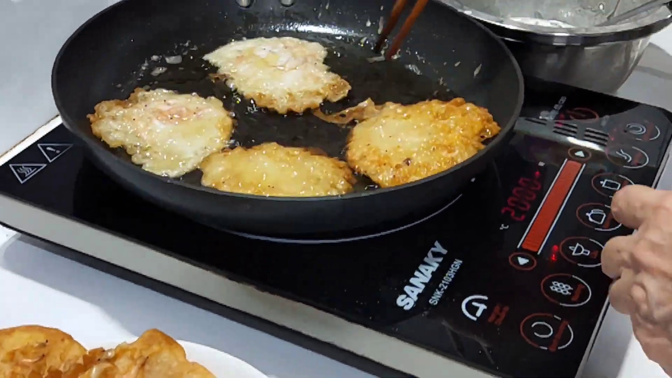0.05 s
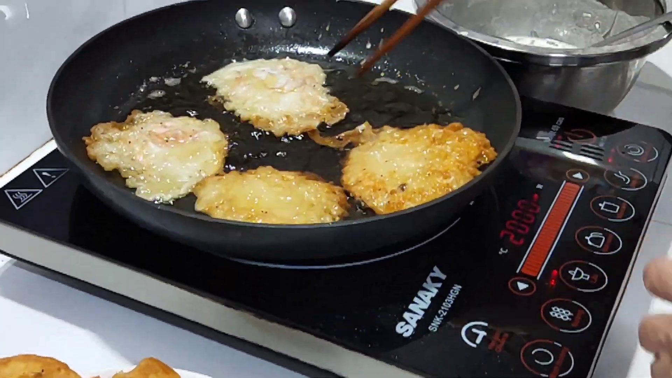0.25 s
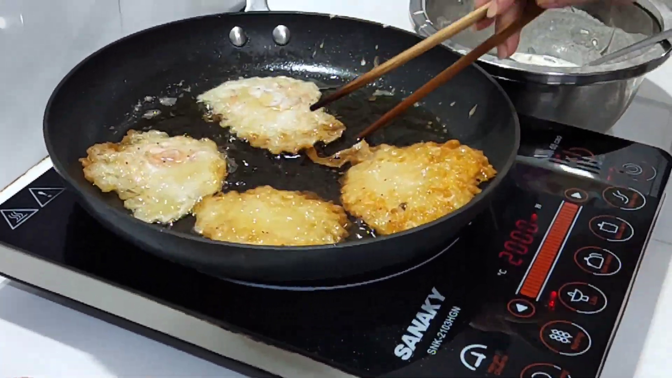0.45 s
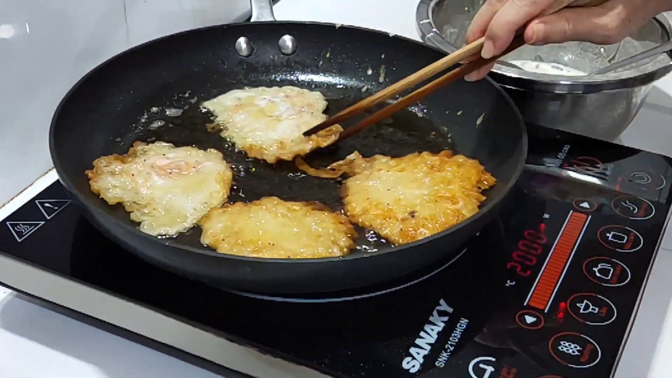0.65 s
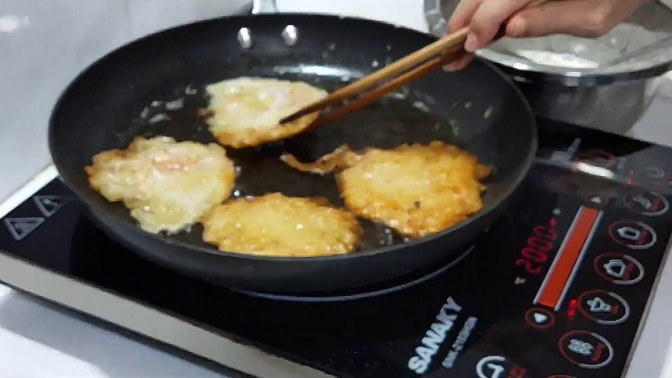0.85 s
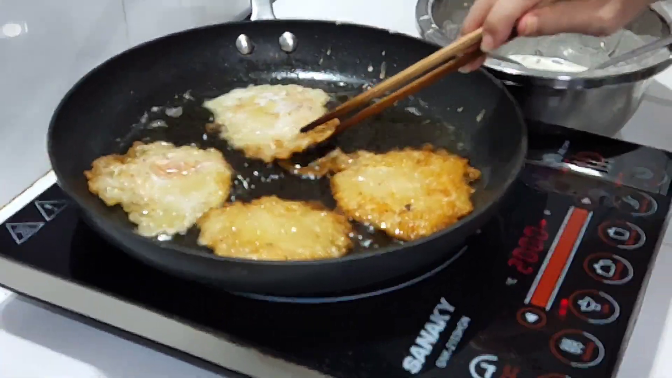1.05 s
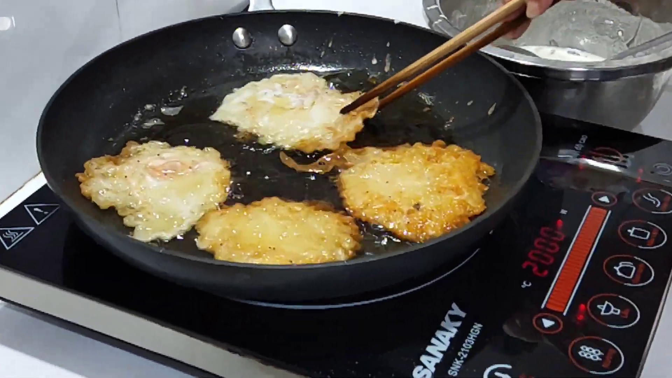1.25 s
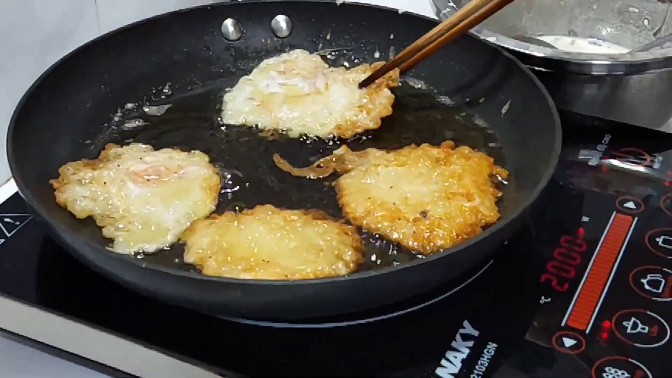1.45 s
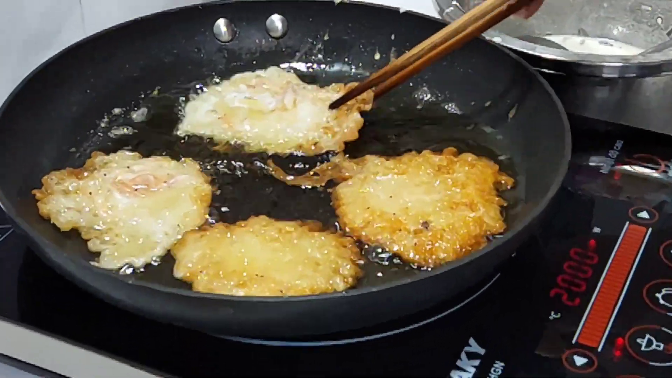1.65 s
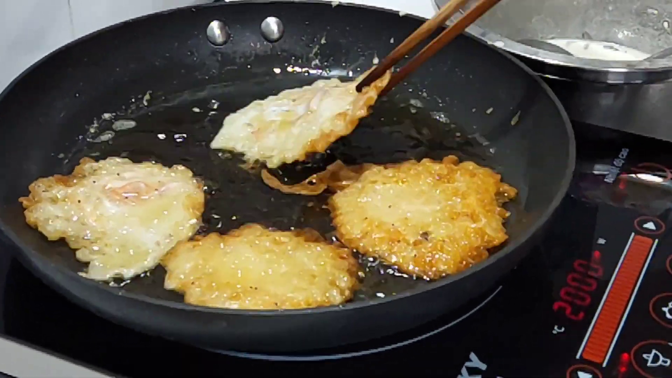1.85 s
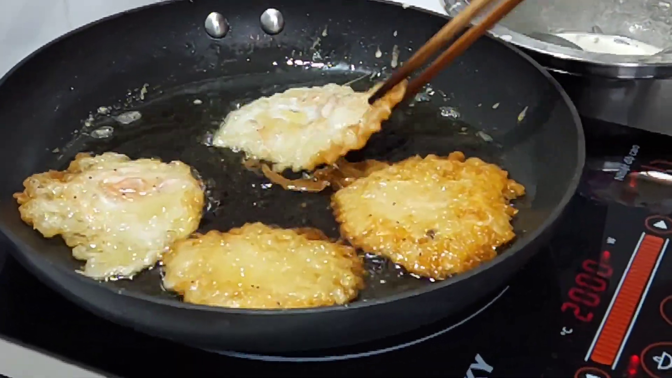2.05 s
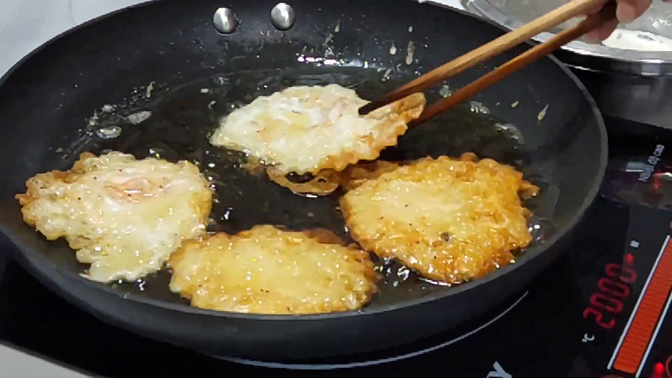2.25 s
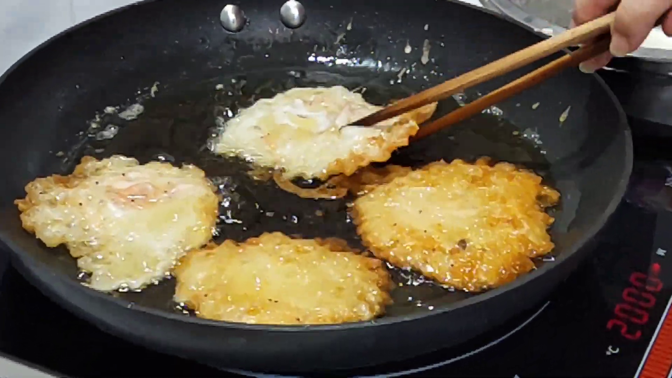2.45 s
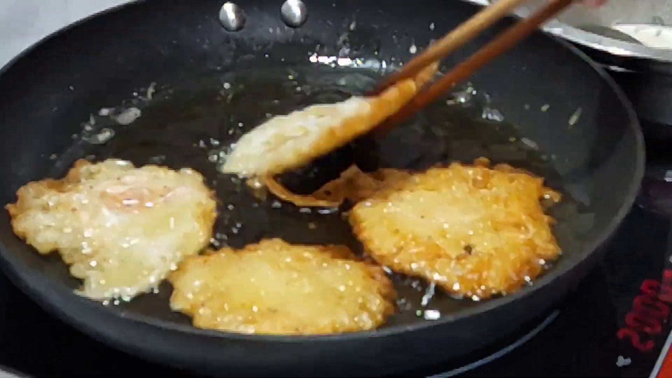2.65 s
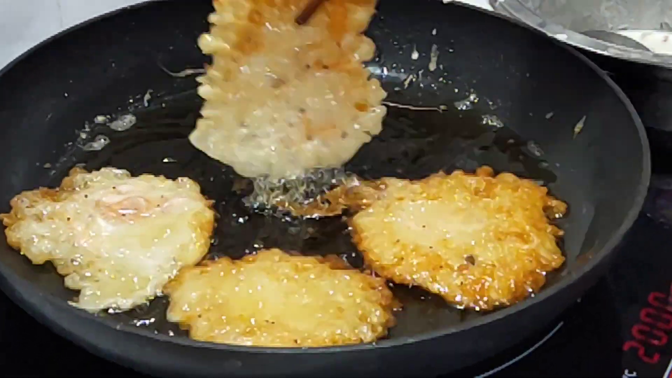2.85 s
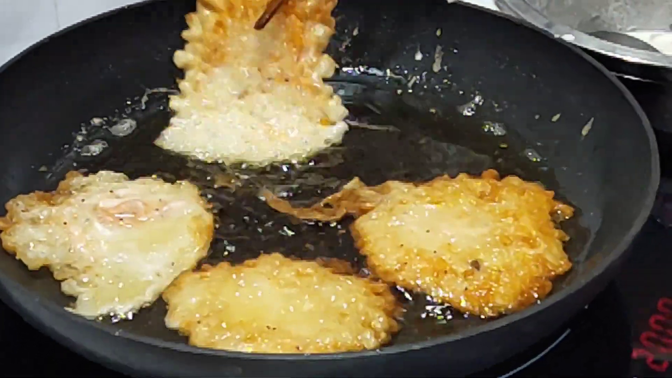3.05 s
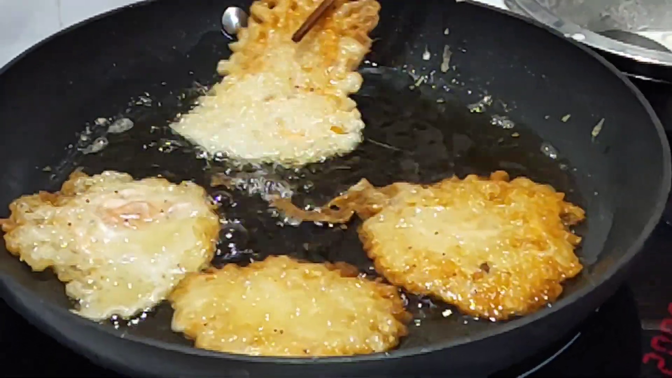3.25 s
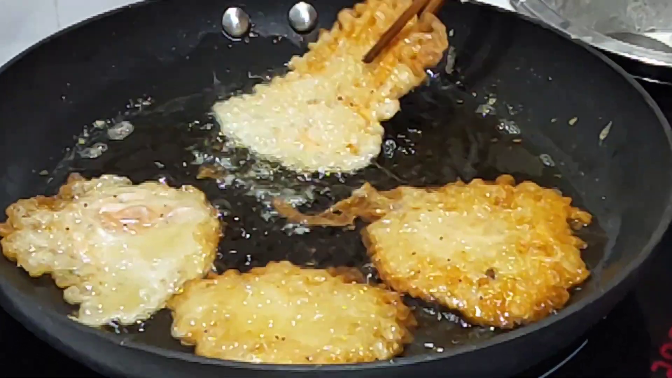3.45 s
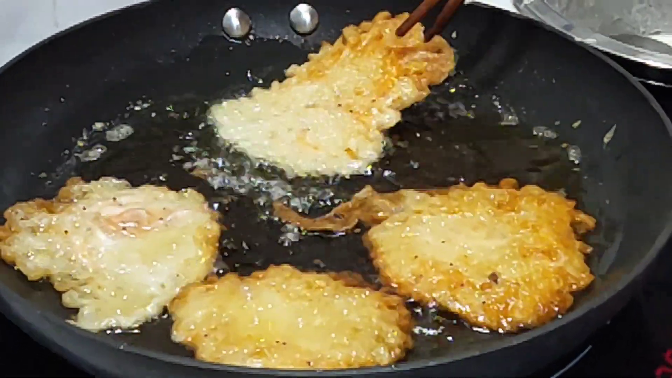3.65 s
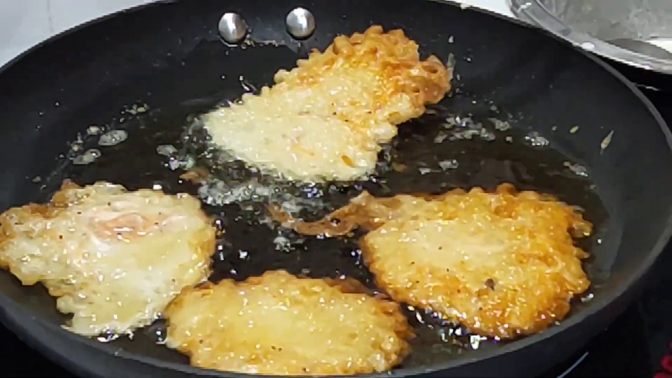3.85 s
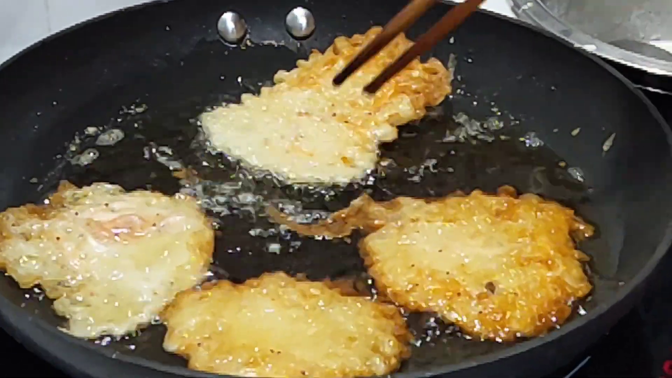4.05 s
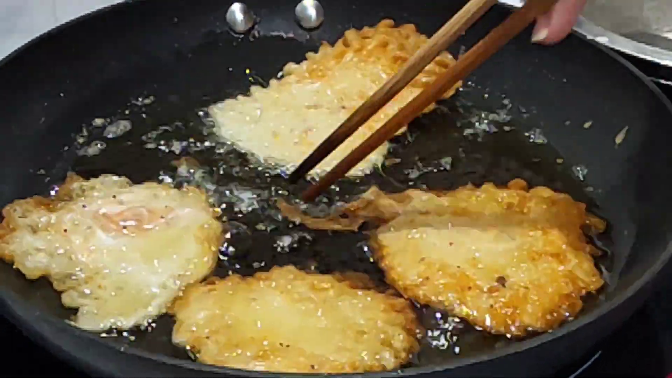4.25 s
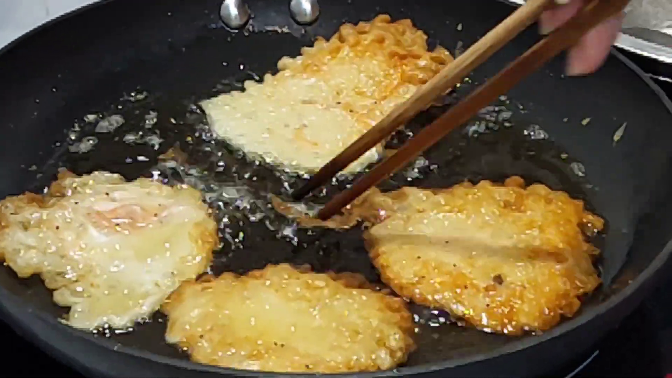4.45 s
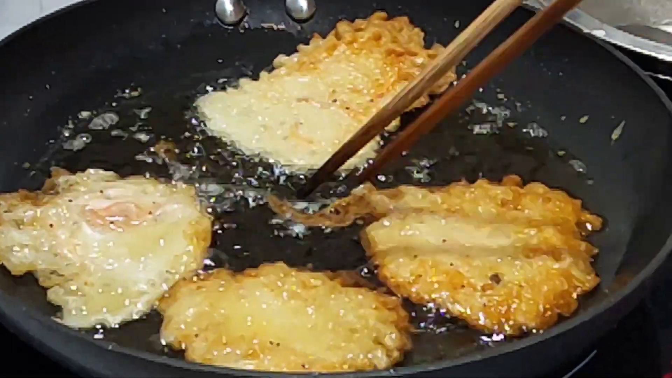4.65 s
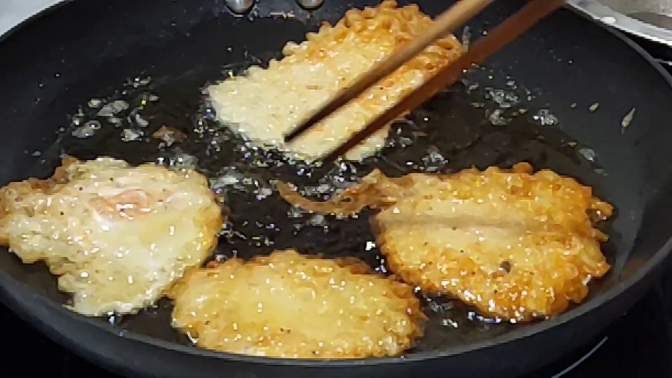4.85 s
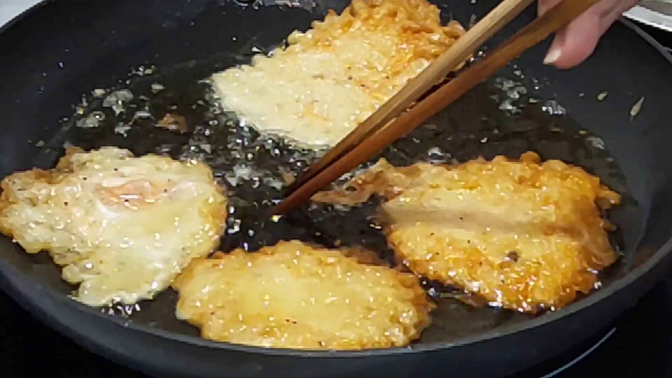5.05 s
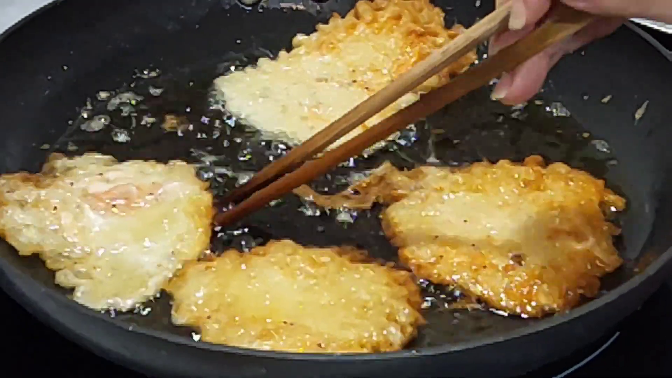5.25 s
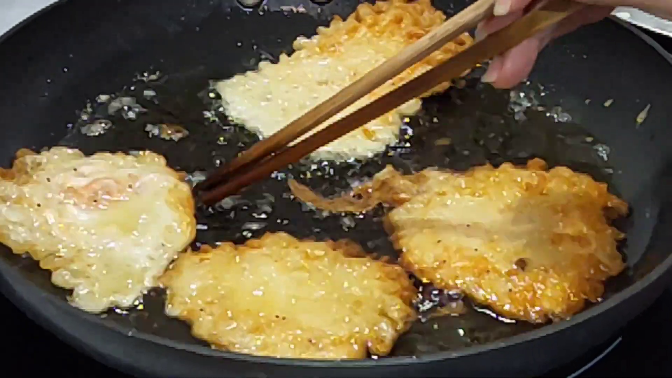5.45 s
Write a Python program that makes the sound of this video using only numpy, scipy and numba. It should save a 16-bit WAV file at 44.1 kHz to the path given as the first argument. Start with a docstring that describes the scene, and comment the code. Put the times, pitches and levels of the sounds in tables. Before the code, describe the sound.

Sparse spitting of frying oil swells into a dense sizzle, with a steady cooktop fan and a light chopstick tap on the pan.

```python
"""In a small kitchen, just above the pan, fritters fry in shallow oil on an induction hob whose fan hums.
Water in the batter boils, and each steam bubble rings as a damped oscillator: a sparse crackle at first,
then a dense sizzle once a fritter is turned onto its wet side. Large bubbles pop and spit on top,
chopsticks drag and tap on the pan, and pan wall, counter and room reflect the sound."""
import sys
import numpy as np
from scipy import signal
from scipy.fft import rfft, irfft
from scipy.io import wavfile
from scipy.ndimage import uniform_filter1d
from numba import njit

SR = 44100
rng = np.random.default_rng(int(sys.argv[2]) if len(sys.argv) > 2 else 0)


def master(y):
    """Save y as 16-bit WAV."""
    cut = np.clip(np.atleast_2d(y).T, -1, 1)
    pcm = np.round(cut * 32767)  # scale
    wavfile.write(sys.argv[1], SR, pcm.astype(np.int16))


N = 242991


def undb(db):
    """Amplitude ratio of a level in decibels."""
    return 10 ** (np.asarray(db) / 20)


def unit(x):
    """Normalisation to an rms of 1."""
    return x / np.sqrt(np.mean(x ** 2))


def colour(x, points, share=1):
    """Spectral shaping by (frequency_hz, gain_db) points, interpolated in log frequency."""
    hz, db = np.transpose(points)
    bins = np.maximum(np.fft.rfftfreq(2 * N, 1 / SR), 1)
    gain = undb(share * np.interp(np.log(bins), np.log(hz), db))
    return irfft(rfft(x, 2 * N) * gain)[..., :N]


def wander(rate_hz):
    """Slow random modulation: random steps, smoothed twice, at an rms of 1."""
    hold = int(SR / rate_hz)
    steps = np.repeat(rng.standard_normal(N // hold + 1), hold)
    return unit(uniform_filter1d(uniform_filter1d(steps, hold), hold)[:N])


def surge(start_s, rise_s, fade_db_per_s):
    """An envelope of linear rise to 1 and exponential decay."""
    age = np.arange(N) / SR - start_s
    return np.clip(age / rise_s, 0, 1) * undb(-fade_db_per_s * np.maximum(age - rise_s, 0))


def add(out, sound, start_s):
    """Superposition of a stereo sound on the mix."""
    i = max(int(start_s * SR), 0)
    part = sound[:, :max(N - i, 0)]
    out[:, i:i + part.shape[1]] += part


@njit
def damped_sines(start_s, hz, cycles, size, glide):
    """Damped oscillators; glide raises the pitch, as when a bubble nears the surface."""
    out = np.zeros(N)
    for k in range(len(start_s)):
        decay_s = cycles[k] / hz[k]
        end = min(int((start_s[k] + 6 * decay_s) * SR), N)
        for i in range(max(int(start_s[k] * SR) + 1, 0), end):
            t = i / SR - start_s[k]
            phase = 2 * np.pi * hz[k] * t * (1 + glide * t / decay_s)
            out[i] += size[k] * np.exp(-t / decay_s) * np.sin(phase)
    return out


def swarm(rate_per_s, low_hz, high_hz, cycles, scatter_db, glide,
          spread_db=3.5, echo_db=-5, echo_s=0.0024):
    """A Poisson process of damped oscillations all over the pan, at constant mean power."""
    born = np.flatnonzero(rng.random(N) < rate_per_s / SR)
    pitch, damping, *detours = rng.random((len(born), 4)).T
    strength, place, path = rng.standard_normal((len(born), 3)).T
    hz = low_hz + (high_hz - low_hz) * pitch
    ring_cycles = cycles * 2 ** (2 * damping - 1)
    size = undb(scatter_db * np.minimum(strength, 2.4)) * np.sqrt(hz / ring_cycles / rate_per_s[born])
    lag_s = (0.06 + 0.052 * path) / 1000  # between left and right
    channels = []
    for side, detour in zip((1, -1), detours):
        arrival_s = born / SR + side * lag_s / 2
        heard = size * undb(-side * spread_db * place / 2)
        direct = damped_sines(arrival_s, hz, ring_cycles, heard, glide)
        # every spot has its own reflection off the pan wall
        echo = damped_sines(arrival_s + detour * echo_s, hz, ring_cycles, heard * undb(echo_db), glide)
        channels.append(direct + echo)
    return unit(np.array(channels))


# spectrum of the room's rumble: frequency_hz, gain_db
RUMBLE_SPECTRUM = [(15, -5), (28, -4), (42, -5), (58, -7.5), (72, 5.5), (81, -11.5), (92, 1), (110, -10.5),
                   (150, -9.5), (300, -36.5)]
# spectrum of its swell: frequency_hz, gain_db
SWELL_SPECTRUM = [(30, -15), (55, -7), (72, 1), (95, -0.5), (125, -12.5), (250, -30.5)]


def rumble(steady_db=-57.3, waver_db=0, swell_db=-44):
    """Low room noise with one soft swell; long wavelengths reach left and right nearly in phase."""
    steady, swell = rng.standard_normal((2, 1, N)) + 0.32 * rng.standard_normal((2, 2, N))
    steady = unit(colour(steady, RUMBLE_SPECTRUM)) * undb(steady_db + waver_db * wander(4.2))
    swell = unit(colour(swell, SWELL_SPECTRUM)) * undb(swell_db)
    return steady + swell * surge(start_s=4.205, rise_s=0.33, fade_db_per_s=21.5)


# air rushing through the hob: frequency_hz, gain_db
AIRFLOW_SPECTRUM = [(60, -22.5), (120, -15.5), (160, -14), (195, -0.5), (250, 1.5), (310, 4), (360, -0.5),
                    (390, -4), (415, 3.5), (440, -1), (480, -1), (590, -3), (780, -0.5), (960, -9.5),
                    (1100, -18), (1800, -30)]
# hiss of the vent grille: frequency_hz, gain_db
GRILLE_SPECTRUM = [(600, -40), (1100, -6), (1400, 7.5), (2000, 4), (2600, -2.5), (4000, -3), (8000, -29.5)]
# fan and motor tones: pitch_hz, level_db
ROTOR_TONES = [(92, -63), (200, -49), (322, -48.3), (408, -42.2), (466, -52), (525, -52.5), (814, -56.5),
               (920, -54.5), (969, -54), (1625, -57.5)]


def fan(air_db=-35, grille_db=-48, pitch_drift=0.00327, waver_db=1.8):
    """Turbulent air makes broadband noise; the rotation of fan and motor adds slightly wavering tones."""
    mid, side = rng.standard_normal((2, N))
    side = colour(side, [(100, -12), (280, -13.5), (500, -8.5), (1000, -2.5), (2000, 0)])
    air = np.array([mid + side, mid - side])  # left and right are alike in the bass
    tones = 0
    for hz, db in ROTOR_TONES:
        phase = 2 * np.pi * np.cumsum(hz * (1 + pitch_drift * wander(20))) / SR
        tones = tones + np.sqrt(2) * undb(db + waver_db * wander(16)) * np.sin(phase)
    rush = undb(air_db) * unit(colour(air, AIRFLOW_SPECTRUM))
    hiss = undb(grille_db) * unit(colour(air, GRILLE_SPECTRUM))
    return rush + hiss + tones


def chopstick_drag(level_db=-41.5):
    """Stick-slip friction of the chopstick tips excites a low mutter in the pan's base."""
    slips = swarm(np.full(N, 150.), low_hz=277, high_hz=437, cycles=4.7, scatter_db=3.5,
                  glide=0, spread_db=0.5)
    return slips * undb(level_db) * surge(start_s=4.72, rise_s=0.43, fade_db_per_s=32)


# chopstick taps on the pan: start_s, level_db
TAPS = [(5.1675, -36.5), (5.191, -27.5)]
# pan modes that a tap excites: pitch_hz, gain_db, t60_s
TAP_MODES = [(693, -3, 0.067), (1120, 0, 0.025), (1510, 6, 0.022), (2060, 3, 0.016)]


def chopstick_taps(click_db=-1, click_s=0.004):
    """Impact excitation: wood gives a dry click, and the oil-damped modes of the pan ring briefly."""
    out, t = np.zeros((2, N)), np.arange(SR // 10) / SR
    ring = sum(undb(db - 60 * t / t60_s) * np.sin(2 * np.pi * hz * t) for hz, db, t60_s in TAP_MODES)
    wood = signal.butter(2, [700, 2200], "band", fs=SR, output="sos")
    for start_s, db in TAPS:
        click = unit(signal.sosfilt(wood, rng.standard_normal((2, len(t))))) * np.exp(-t / click_s)
        add(out, undb(db) * (ring + undb(click_db) * click), start_s)
    return out


# flares of steam as wet batter meets hot oil, when the fritter is lifted, turned, pressed, stirred round:
# start_s, rise_s, fade_db_per_s, relative_sizzle_db, relative_gurgle_db
STEAM_FLARES = [(2.63, 0.45, 3, -34, -59), (3.125, 0.06, 1.5, -24.5, -34.5), (3.25, 0.15, 30, -27.5, -40),
                (3.85, 0.14, 15, -30, -38), (4.41, 0.08, 120, -24, -52), (4.77, 0.08, 28, -33, -31),
                (5.15, 0.1, 15, -31, -51)]
SIMMER_SIZZLE_DB, SIMMER_GURGLE_DB = -45.5, -50  # the browned sides, on the same relative scale


def boiling(gurgle_extra_db_per_s=3):
    """Incoherent sources add in power: simmer plus flares give the envelopes of sizzle and gurgle."""
    sizzle_power, gurgle_power = undb(SIMMER_SIZZLE_DB) ** 2, undb(SIMMER_GURGLE_DB) ** 2
    for start_s, rise_s, fade, sizzle_db, gurgle_db in STEAM_FLARES:
        sizzle_power += (undb(sizzle_db) * surge(start_s, rise_s, fade)) ** 2
        gurgle_power += (undb(gurgle_db) * surge(start_s, rise_s, fade + gurgle_extra_db_per_s)) ** 2
    return np.sqrt(sizzle_power), np.sqrt(gurgle_power)


def gurgle(envelope):
    """Bubble resonance: steam pockets of like size escape from under the fritter at like pitches."""
    pockets = swarm(np.full(N, 300.), low_hz=1764, high_hz=2380, cycles=4.7, scatter_db=6, glide=0.0023)
    return pockets * envelope


# spectral envelope of the sizzle: frequency_hz, gain_db
SIZZLE_SPECTRUM = [(300, -33.5), (700, -8), (1200, -9), (1700, -7.5), (2100, -4.5), (2700, -4.5),
                   (3500, -5), (4300, 1), (5000, 3), (5700, 1), (6500, 2.5), (7400, -0.3)]


def sizzle(envelope, simmer_bubbles_per_s=1500, crackle_db=-4.5, flurry_db=0.5):
    """Nucleate boiling: tiny bubbles fizz and larger ones crackle, the more so the harder it boils."""
    rate = simmer_bubbles_per_s * (envelope / undb(SIMMER_SIZZLE_DB)) ** 0.45
    fizz = swarm(rate, low_hz=1165, high_hz=7530, cycles=2.24, scatter_db=5, glide=0.005)
    crackle = swarm(rate * 0.045, low_hz=2504, high_hz=7420, cycles=4.3, scatter_db=3.5, glide=0.0027)
    crackle_share = undb(crackle_db) * (envelope / envelope.max()) ** 0.18
    bubbles = unit(colour(fizz + crackle_share * crackle, SIZZLE_SPECTRUM))
    return bubbles * envelope * undb(flurry_db * wander(30))


def cavity(age, hz, swell_s, glide):
    """Helmholtz resonance: an opening bubble swells, rises in pitch as its mouth widens, and collapses."""
    rise = np.maximum(age, 0) / swell_s
    sweep = 1 + glide * (rise / 2 - 1)
    return rise ** 2 * np.exp(-rise ** 2) * np.sin(2 * np.pi * hz * age * sweep)


# pan resonances that a bursting film excites: pitch_hz, bandwidth_hz, gain_db
CRACK_MODES = [(2040, 500, 0), (3270, 1000, -5.5), (7070, 670, -2.5)]


def film_crack(t, bubble_hz, decay_s):
    """Impulse excitation: the oil film ruptures and drives the pan's broad, oil-damped resonances."""
    noise = rng.standard_normal(len(t)) + 1.5 * rng.standard_normal((2, len(t)))
    burst = noise * t * np.exp(-t / decay_s)
    ring = sum(undb(db) * signal.lfilter(*signal.iirpeak(hz, hz / width_hz, fs=SR), burst)
               for hz, width_hz, db in CRACK_MODES)
    low_hz = np.clip(bubble_hz / 2 ** 0.92, 1650, 5200)
    band = signal.butter(4, [low_hz, 8500], "band", fs=SR, output="sos")
    soften = signal.butter(1, min(2 * bubble_hz, 15000), fs=SR, output="sos")
    return unit(signal.sosfilt(np.vstack([band, soften]), burst + ring))


def droplets(t, bubble_hz, decay_s=0.03):
    """Flung droplets patter back as decaying narrow-band noise around the bubble's pitch."""
    band = signal.butter(2, [bubble_hz * 0.92, bubble_hz * 1.16], "band", fs=SR, output="sos")
    return unit(signal.sosfilt(band, rng.standard_normal((2, len(t))) * np.exp(-t / decay_s)))


def reflections(x, t, decay_s, gap_s):
    """Diffuse reflection: convolution with noise that decays exponentially and begins after a gap."""
    response = rng.standard_normal((2, len(t))) * np.exp(-t / decay_s) * (t > gap_s)
    return signal.fftconvolve(x, unit(response) / np.sqrt(len(t)), axes=1)[:, :x.shape[1]]


# the loudest steam pops: start_s, pitch_hz, relative_bubble_db, relative_crack_db, left_minus_right_db
STEAM_POPS = [(0.0348, 2420, -21, -31, 4), (0.0872, 4340, -26, -36, -3), (0.1709, 4150, -22, -30.5, -1.5),
              (0.276, 3830, -31, -33, 7), (0.3078, 2740, -21, -31, 1), (0.3125, 2970, -26.5, -42, -4),
              (0.5071, 4300, -27, -44, 2), (0.561, 5730, -30.5, -38, 0), (0.591, 6200, -37, -26.5, 4),
              (0.599, 6650, -34, -36, 3), (0.6354, 2100, -30, -23, 4), (0.6622, 2110, -26.5, -21, -1),
              (0.665, 2780, -25, -36, -1), (0.7506, 5400, -30, -28.5, 2), (0.779, 2990, -33, -24.5, 4),
              (0.811, 3180, -36, -33.5, 0), (0.825, 6100, -32, -35, 0), (0.848, 5120, -30.5, -35.5, -1),
              (0.872, 6770, -32, -35, 0), (0.9, 6460, -30, -33, 0), (0.946, 6070, -34, -32, 2),
              (1.023, 5120, -23, -28.5, -4), (1.053, 6660, -27, -33, 0), (1.0592, 4500, -22, -29, 1),
              (1.1399, 3140, -29, -20, -2), (1.1886, 5400, -28, -32, 0), (1.263, 2190, -28, -20, 0),
              (1.3018, 5600, -31, -38, 1), (1.314, 5100, -30, -32, -1), (1.369, 5700, -30, -38, 2),
              (1.3937, 2820, -21.5, -20, -3), (1.3953, 3420, -21, -29, 1.5), (1.398, 2820, -24, -36, 3),
              (1.4655, 6800, -30.5, -37, -3.5), (1.5, 6820, -30, -34, 2), (1.589, 5950, -28, -29, -2),
              (1.6241, 5540, -31, -33, -3), (1.672, 6860, -29.5, -33, 1), (1.69, 7000, -31, -33, 2),
              (1.7338, 6900, -29, -47, -0.5), (1.8343, 5680, -24, -31, 0), (1.8703, 2450, -23, -16.5, 2),
              (1.8717, 3780, -24, -30, 3), (1.9104, 4360, -30, -24, 5), (1.9527, 4820, -25, -23.5, 3.5),
              (2.0714, 5970, -18, -28, 0), (2.153, 6670, -31, -46, -0.5), (2.1718, 6700, -30.5, -36, -3),
              (2.2113, 6100, -36, -27.5, 2), (2.2183, 6050, -28, -27, -2), (2.229, 3250, -36, -27.5, 0),
              (2.3141, 3570, -27.5, -26.5, -3.5), (2.3744, 6900, -29, -46, -1),
              (2.4537, 5100, -29, -46, -1), (2.485, 4200, -32, -30, 0), (2.497, 3900, -33, -35, -1),
              (2.5068, 5170, -22, -28, -0.5), (2.536, 4870, -28, -33, 3), (2.5809, 5100, -33.5, -32, 5),
              (2.653, 5600, -26, -24.5, 0), (2.736, 6400, -27.5, -38, 1), (2.7735, 4450, -20, -24.5, -2),
              (2.792, 3560, -33.5, -27.5, 2), (2.8448, 6650, -22, -29, -2.5), (2.878, 5170, -27, -34, 0),
              (2.9002, 5240, -27, -43, 1.5), (2.9276, 6330, -23.5, -37, 0), (2.989, 6530, -25.5, -34, -1),
              (3.008, 4800, -25, -30, 0.5), (3.041, 6950, -23, -33, 0), (3.0526, 2260, -13, -18.5, -1.5),
              (3.146, 2000, -21, -31.5, -1), (3.1493, 4630, -16.5, -16, 2), (3.1567, 2020, -11, -27.5, -2),
              (3.1769, 5370, -21.5, -24, 6), (3.191, 2150, -25, -40, -7.5), (3.243, 2520, -21, -22, 1),
              (3.2721, 4830, -18.5, -24, 2.5), (3.287, 2220, -26, -24.5, -4), (3.388, 2050, -19.5, -16, -2),
              (3.395, 2150, -20, -18, -7), (3.458, 2040, -24.5, -22, 1), (3.5201, 4150, -17.5, -30, -1),
              (3.591, 2250, -19, -18, 0), (3.6162, 3520, -20.5, -18.5, 2), (3.646, 2260, -19.5, -22.5, 0),
              (3.707, 2260, -24.5, -20, 2), (3.7329, 2090, -21.5, -14.5, -0.5),
              (3.7335, 6900, -17, -29, -0.5), (3.7395, 6740, -21.5, -31, 0.5),
              (3.7585, 4900, -18.5, -29, 1), (3.776, 2820, -23, -23.5, 1), (3.8525, 2037, -15, -13, -2),
              (3.873, 2700, -23, -19, 1), (3.8997, 4330, -18, -23, -1.5), (3.9442, 2170, -19, -14.5, -4),
              (4.1237, 5130, -19.5, -19, -1), (4.1433, 2055, -16.5, -10.5, 3),
              (4.1555, 2010, -15.5, -28, 0.5), (4.1871, 4600, -28, -27, -3), (4.204, 6370, -21.5, -20, -1),
              (4.3188, 4100, -17, -21, 2), (4.3996, 6500, -19, -20.5, -1.5),
              (4.4005, 1990, -16, -18.5, -2.5), (4.412, 6600, -19, -14, 3), (4.492, 5550, -15.5, -26, 2),
              (4.632, 2100, -22, -30, 2), (4.6367, 2066, -15, -16, 2), (4.748, 7060, -16.5, -26, -0.5),
              (4.8185, 1960, -22, -33, -2), (4.8225, 1950, -10, -25, -1), (4.852, 1990, -22, -25.5, -2),
              (4.9164, 5200, -18, -16.5, 1.5), (4.9642, 2010, -9.5, -18, 7), (4.9818, 4450, -18, -23, -3),
              (5.004, 2110, -13.5, -20.5, 3), (5.0247, 2180, -28, -24.5, 0), (5.0917, 3360, -21, -19, -1),
              (5.165, 7160, -19, -23, 1), (5.209, 7160, -19, -25, 2), (5.228, 5070, -18, -24, 0),
              (5.258, 6110, -18.5, -23, 1), (5.273, 2860, -23, -17.5, -4.5), (5.293, 6300, -21, -26, -1),
              (5.3197, 5720, -14.5, -34, -1), (5.354, 6300, -16.5, -34, 0), (5.3963, 4460, -16, -22, 0),
              (5.4299, 2270, -15, -14, -3.5), (5.463, 3560, -26, -25, 4), (5.503, 4512, -18, -22, 2)]


def steam_pops(glide=0.058, twin_db=-9, droplets_db=-9, wall_db=-8, lag_s=43e-6):
    """Bubble bursting: the film cracks, two cavities resonate, droplets fall; small bubbles end sooner."""
    out, t = np.zeros((2, N)), np.arange(SR // 8) / SR
    age = t - np.array([[lag_s], [0]])
    energy_scale = np.sqrt(0.002 * SR / len(t))  # a level stands for the energy of 2 ms at that rms
    for start_s, hz, bubble_db, crack_db, balance_db in STEAM_POPS:
        size = (2000 / hz) ** 0.95  # relative to a 2 kHz bubble
        swell_s, twin_delay_s = 0.0018 * size, 0.00341 * size
        sweep, detune = rng.uniform(-0.9, 1, 2)
        first = cavity(age, hz, swell_s, glide * (1 + sweep))
        twin = undb(twin_db) * cavity(age - twin_delay_s, hz * (1 + 0.14 * detune), swell_s, glide)
        crack = film_crack(t, hz, decay_s=0.0017 * np.sqrt(size))
        body = unit(first + twin) + undb(droplets_db) * np.sqrt(size) * droplets(t, hz)
        pop = (undb(bubble_db) * body + undb(crack_db - 1) * crack) * energy_scale
        # early reflections off pan wall and counter, different for each spot
        pop = pop + undb(wall_db) * size * reflections(pop, t, decay_s=0.0054, gap_s=0.002)
        add(out, pop * undb(np.array([[balance_db], [-balance_db]]) / 2), start_s)
    return out


def kitchen(x, room_db, t60_s=0.38):
    """Reverberation: the small hard room adds a short tail."""
    t = np.arange(SR // 2) / SR
    return x + undb(room_db) * reflections(x, t, decay_s=t60_s / np.log(1000), gap_s=0.005)


def scene():
    """Superposition of the pan, its reverberation, the fan and the room's rumble."""
    sizzle_envelope, gurgle_envelope = boiling()
    frying = undb(-1) * sizzle(sizzle_envelope) + undb(-2.5) * gurgle(gurgle_envelope)
    continuous = kitchen(frying, room_db=-7.5) + fan() + rumble()
    transients = undb(-2) * steam_pops() + chopstick_taps() + chopstick_drag()
    return continuous + kitchen(transients, room_db=-8)


# response of the two microphone ports: frequency_hz, left_minus_right_db
PORT_BALANCE = [(60, 1.5), (300, 3), (550, 2.5), (720, 4), (1000, 1), (1600, 3), (2000, 7), (2500, -4),
                (2900, 1.5), (3400, 4), (5000, 4), (5600, 1), (6400, -9.5), (7500, -4.5)]


def record(dry, ceiling=0.9, cutoff_hz=7750):
    """Transduction: each port colours the sound, saturation rounds the peaks, a low-pass cuts the top."""
    ports = colour(dry, PORT_BALANCE, share=np.array([[1], [-1]]) / 2)
    rounded = ceiling * np.tanh(ports / ceiling)
    return signal.sosfilt(signal.cheby1(16, 0.3, cutoff_hz, fs=SR, output="sos"), rounded)


dry = scene()
out = record(dry)
master(out)
```